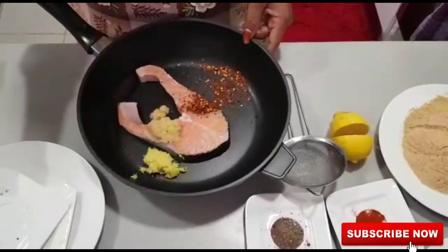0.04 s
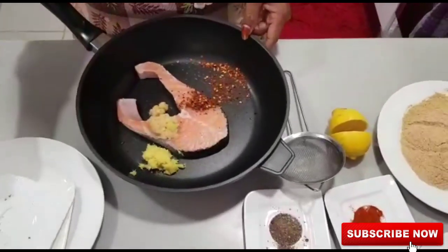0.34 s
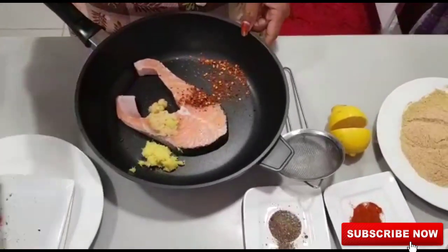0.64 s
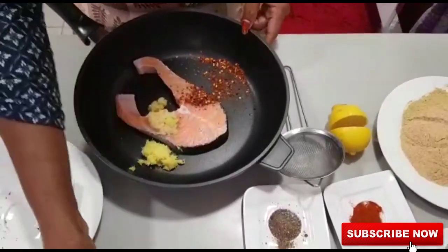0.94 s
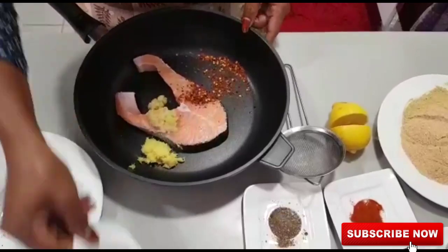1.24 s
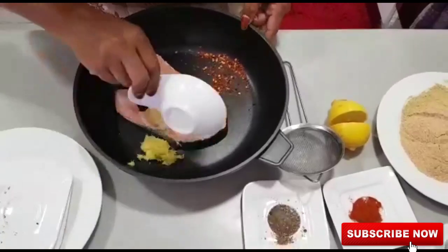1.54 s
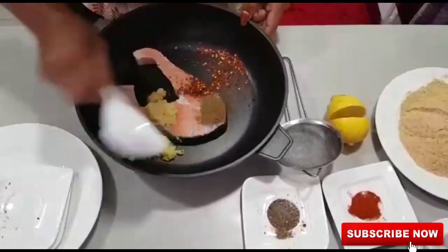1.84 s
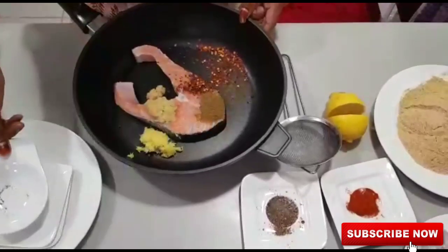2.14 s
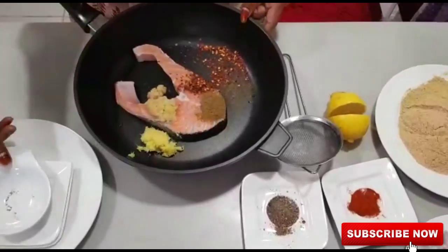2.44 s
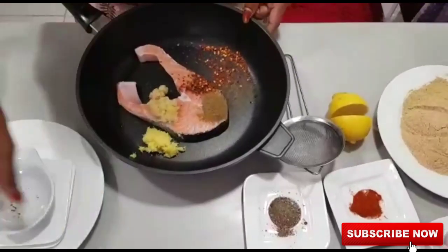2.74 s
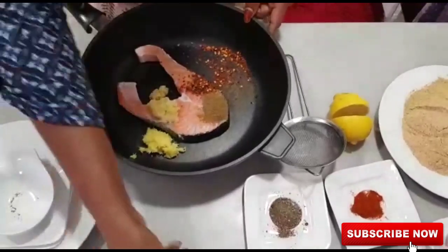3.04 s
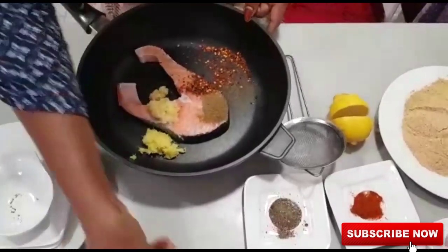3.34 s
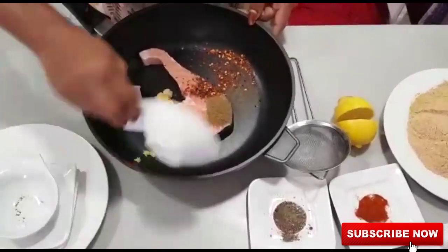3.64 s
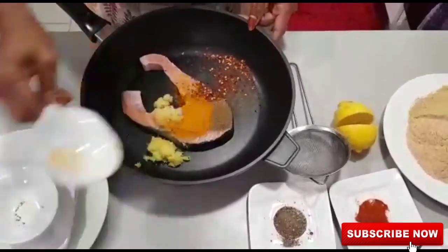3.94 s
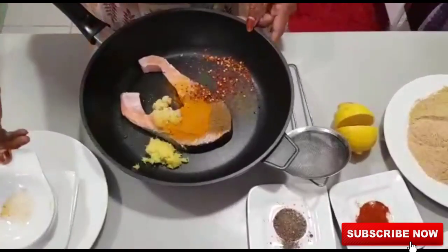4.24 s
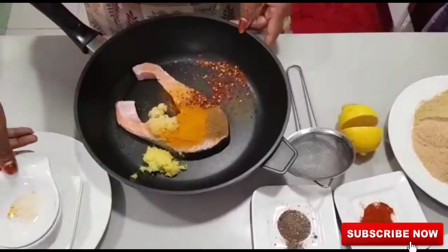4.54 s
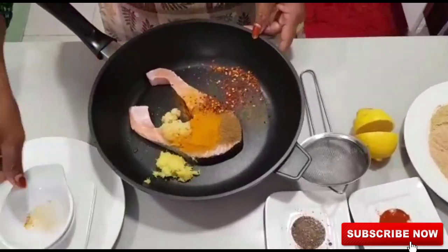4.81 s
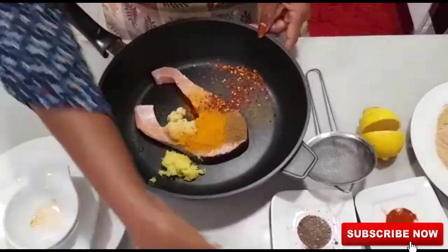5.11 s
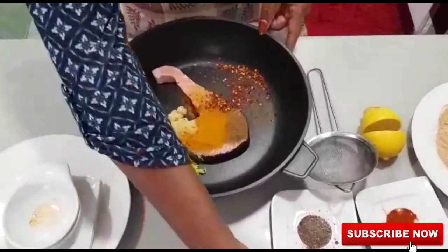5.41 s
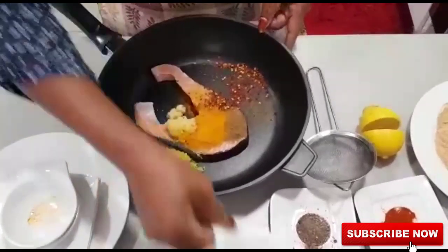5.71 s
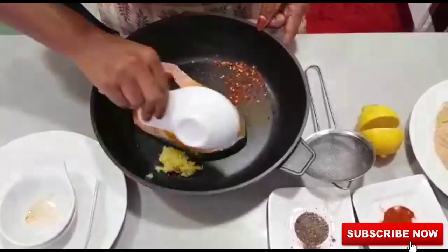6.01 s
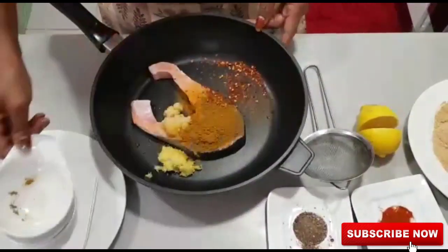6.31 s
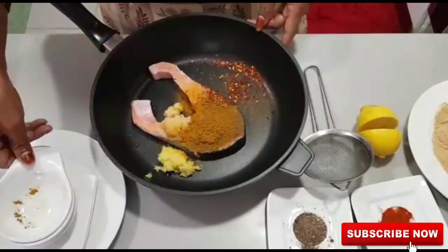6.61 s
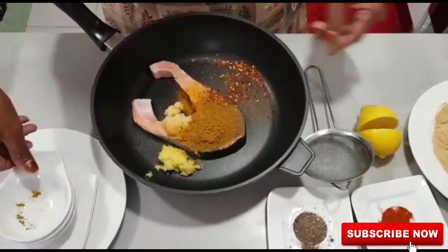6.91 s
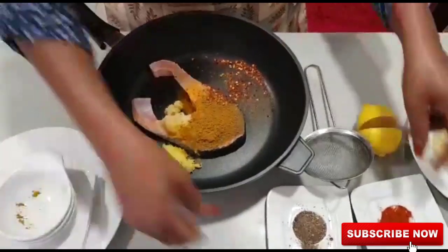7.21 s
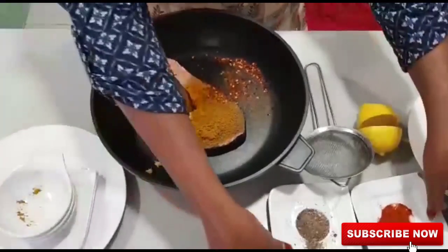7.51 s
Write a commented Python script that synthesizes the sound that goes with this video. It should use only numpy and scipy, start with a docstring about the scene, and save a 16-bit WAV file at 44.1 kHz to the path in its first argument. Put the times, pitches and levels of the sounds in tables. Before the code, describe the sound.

In a quiet, hard-walled kitchen, a ceramic dish clatters onto a plate and settles. Small spice bowls are then handled one after another: a knock on the worktop or a faint scrape as one is lifted, then a bright clink and rattle as it is stacked slightly to the left. This happens three times, and a last light knock follows. Close microphones above the worktop catch a short echo and low room noise.

```python
"""Over a low room murmur, a square ceramic dish clatters onto a plate in a quiet, hard-walled kitchen.
Spices are being tipped into a frying pan: each small dish knocks on the worktop as it is picked up,
then clatters onto the stack of plates or into the bowl before it.
A pair of microphones hangs above the worktop, with the stack to the left and the full dishes in front."""
import sys
import numpy as np
from scipy import signal
from scipy.fft import rfft, irfft, next_fast_len
from scipy.io import wavfile

SR = 44100
rng = np.random.default_rng(int(sys.argv[2]) if len(sys.argv) > 2 else 0)


def store_wav(level_fs):
    """Save 16-bit WAV to argv[1]."""
    pcm = np.round(np.clip(np.atleast_2d(level_fs), -1, 1) * 32767)
    wavfile.write(sys.argv[1], SR, pcm.T.astype(np.int16))


N = 337611
TIME = np.arange(N) / SR
AGE = np.arange(int(.7 * SR)) / SR   # seconds since a contact


def from_db(db):
    """Decibels to gain."""
    return 10 ** (np.asarray(db) / 20)


def rms_one(x):
    """Scale to rms 1."""
    return x / np.sqrt(np.mean(x ** 2) + 1e-20)


def attack_one(x):
    """Scale so that the first 12 ms have rms 1."""
    return x / np.sqrt(np.mean(x[AGE < .012] ** 2) + 1e-20)


def at_hz(points, hz, column=1):
    """Read one column of a table along log frequency."""
    points = np.array(points)
    return np.interp(np.log(hz + 1e-9), np.log(points[:, 0]), points[:, column])


def dying(t60):
    """Envelope that falls 60 dB in t60 seconds."""
    return np.exp(-np.log(1000) * AGE / t60)


def band(x, low_hz, high_hz, order=2):
    """Causal band-pass."""
    sos = signal.butter(order, [low_hz, min(high_hz, SR / 2 - 500)], "band", fs=SR, output="sos")
    return signal.sosfilt(sos, x + 1e-18)


def resonance(x, hz, width_hz):
    """One resonance with gain 1 on top."""
    r = np.exp(-np.pi * width_hz / SR)
    feedback = [1, -2 * r * np.cos(2 * np.pi * hz / SR), r * r]
    return signal.lfilter(np.array([1, 0, -1]) * (1 - r * r) / 2, feedback, x + 1e-18)


def steep_resonance(x, hz, width_hz):
    """The same resonance twice, for steeper flanks."""
    return resonance(resonance(x, hz, width_hz), hz, width_hz)


def add(track, s, sound):
    """Mix a sound into the track at s seconds."""
    start = int(s * SR)
    track[start:start + len(sound)] += sound[:N - start]


# Diffuse sound across the microphone pair: f/Hz, left-right correlation
PAIR_CORRELATION = [(60, 0.85), (300, .92), (700, 0.33), (1400, 0.32), (3000, -0.11), (15000, 0.13)]

def diffuse_bands(size):
    """Yield (Hz, stereo noise) in half octaves, as alike in both microphones as sound from all sides."""
    edges = np.geomspace(25, 18000, 20)
    white = rng.standard_normal((2, 2, size))
    for k, (low, high) in enumerate(zip(edges, edges[1:])):
        hz = np.sqrt(low * high)
        mid, side = band(white[k % 2], low, high)
        alike = at_hz(PAIR_CORRELATION, hz)
        yield hz, np.sqrt((1 + alike) / 2) * mid + np.sqrt((1 - alike) / 2) * side * np.array([[1], [-1]])


# Room tone from all around the pair, murmur and hiss: f/Hz, relative level/dB per Hz
MURMUR_SPECTRUM = [(25, -32.5), (55, -15), (80, -22), (120, -10.5), (200, -10), (330, -5.5), (560, -24.5),
                   (770, -20.5), (1200, -28), (2000, -34.5), (3000, -39.5)]
HISS_SPECTRUM = [(3000, -3.5), (4300, 3.5), (5200, -3.5), (6500, -8), (7500, -4), (9000, -3), (12000, -4.5),
                 (15000, -2), (16000, -7.5)]
# The kitchen's standing waves, alike in both microphones: f/Hz, width/Hz, relative level/dB
ROOM_MODES = [(56.7, 3.3, -60), (127, 17, -60), (155.2, 4.7, -61.5), (174.2, 12, -66), (239.3, 24, -50.5),
              (292, 32, -59.5), (330.4, 24, -53.5), (371.4, 17, -58), (766, 53, -66.5)]
# Slow swell of murmur and standing waves: t/s, level/dB
ROOM_SWELL = [(0, -56.5), (1, -52.5), (2, -56), (3.6, -53), (5.6, -51.5), (6.3, -53), (7.6, -47)]

def room_tone(waves_db=1, hiss_start_db=-76, hiss_rise_db=7.5):
    """Low room noise gathered in standing waves, under a faint hiss that slowly rises."""
    bands = list(diffuse_bands(N))
    murmur = sum(from_db(at_hz(MURMUR_SPECTRUM, hz)) * noise for hz, noise in bands if hz < 3000)
    hiss = sum(from_db(at_hz(HISS_SPECTRUM, hz)) * noise for hz, noise in bands if hz >= 3000)
    waves = sum(from_db(db) * rms_one(steep_resonance(rng.standard_normal(N), hz, width))
                for hz, width, db in ROOM_MODES)
    swell = from_db(np.interp(TIME, *np.transpose(ROOM_SWELL)))
    hiss_gain = from_db(hiss_start_db + hiss_rise_db * TIME / TIME[-1])
    return swell * (rms_one(murmur) + from_db(waves_db) * rms_one(waves)) + hiss_gain * rms_one(hiss)


def mode_rings(modes):
    """One decaying sine for each mode; glazed clay loses its high modes soonest, which caps t60."""
    return np.array([from_db(db) * np.sin(2 * np.pi * hz * AGE) * dying(min(t60, .52 * (hz / 1600) ** -.45))
                     for hz, db, t60 in modes])


def crack(t60, snap_db, repeat_db, count=95):
    """A snap of noise and a crowd of sines: the many modes of dishes that touch and damp each other."""
    snap = from_db(snap_db) * rng.standard_normal(len(AGE)) * dying(.0068)
    spectrum = np.zeros(len(AGE) // 2 + 1, complex)
    bins = (np.arange(count) + rng.random(count)) / count * (len(spectrum) - 1)
    spectrum[bins.astype(int)] = np.exp(2j * np.pi * rng.random(count))
    crowd = rms_one(irfft(spectrum, len(AGE))) * dying(t60)
    touch = (crowd + snap) * (1 - dying(.005))   # the blow takes a moment to spread through the stack
    repeat = int(rng.uniform(.006, .014) * SR)   # a quieter repeat of the crack follows 6-14 ms later
    return touch + from_db(repeat_db) * np.pad(touch, (repeat, 0))[:len(touch)]


def thud(hz, width_hz, t60, boom_db):
    """The worktop answers with a short, woody thud over a slower low boom."""
    wood_noise, slab_noise = rng.standard_normal((2, len(AGE)))
    pitch_hz = hz * 2 ** (.17 * rng.standard_normal())
    wood = band(resonance(wood_noise * dying(t60), pitch_hz, width_hz), 52, 1500)
    boom = band(slab_noise, 42, 150) * dying(.16)
    return attack_one(wood) + from_db(boom_db) * rms_one(boom) * np.sqrt(.012 / AGE[-1])


OPEN_T60, HELD_T60 = 2.5, .55   # extra damping of an open dish, and of one nested or held (s)
USUAL_BLOW_DB = -20   # the strength at which thud, ring and shimmer are given

def clatter(hits, modes, damping_t60, crack_t60, snap_db, repeat_db, ring_db, shimmer_db,
            knock_hz, knock_width_hz, clink_db, tick_db, thud_db, worktop):
    """Each contact gives a crack, a thud, a click of glaze and ringing modes. Returns (blows, rings)."""
    blows, rings = np.zeros((2, N))
    free_modes = mode_rings(modes) * dying(damping_t60)
    for s, db, softness in hits:
        # the point of contact decides how strongly each mode is struck
        strengths = from_db(3 * rng.standard_normal(len(modes))) * rng.choice([-1, 1], len(modes))
        crack_and_ring = np.array([crack(crack_t60, snap_db, repeat_db), strengths @ free_modes])
        centre_hz = knock_hz * 2 ** (-.02 * softness)   # a softer contact knocks lower
        knock = band(steep_resonance(crack_and_ring, centre_hz, knock_width_hz), 500, 2900)
        clink = band(crack_and_ring, 2800, 6800, order=4)
        clink -= .6 * resonance(clink, 4200, 700)   # dishes radiate little between two groups of modes
        tick = band(crack_and_ring, 6800, 13200, order=3)
        excess_db = db - USUAL_BLOW_DB
        add(blows, s, from_db(thud_db + .65 * excess_db) * thud(**worktop))
        # these lie about an octave apart: a soft contact loses the upper ones
        registers = (knock, 0, ring_db), (clink, clink_db, shimmer_db), (tick, tick_db, shimmer_db)
        for octave, ((blow, ring), colour_db, share_db) in enumerate(registers):
            ring_share = from_db(share_db + excess_db)   # a strong blow throws the dish clear to ring
            gain = from_db(db + colour_db - softness * octave) / np.sqrt(1 + ring_share ** 2)
            add(blows, s, gain * attack_one(blow))
            add(rings, s, gain * ring_share * attack_one(ring))
        glaze = band(rng.standard_normal(len(AGE)) * dying(.003), 9500, 17000)
        add(blows, s, from_db(db + tick_db - 2 * softness - 13) * attack_one(glaze))
    return np.array([blows, rings])


# Contacts on the large plate, a little left of the pair: t/s, level/dB, softness/dB per octave
PLATE_CONTACTS = [(0.165, -15, 4), (0.179, -10.5, 4.4), (0.2635, -20, 5.8), (0.3175, -19.5, 6.4),
                  (0.348, -16, 20), (0.6435, -17, 18)]
# Their ring: f/Hz, level/dB, t60/s before damping
PLATE_RING = [(1186, -6, 0.41), (1628, -5, 0.36), (2216, -1, 0.31), (2359, 0, 0.3), (2647, -3, 0.29),
              (3701, -2, 0.25), (4448, -8, 0.23), (4617, -5, 0.22), (5120, -9, 0.21), (5267, -7, 0.21),
              (5341, -6, 0.21), (6581, -7, 0.19), (7388, -10, 0.18), (7790, -7, 0.18), (9335, -10, 0.16),
              (10064, -4, 0.16), (10761, -11, 0.15), (11198, -14, 0.15), (11717, -5, 0.15),
              (12520, -8, 0.14), (13374, -10, 0.14), (15124, -17, 0.13)]

def dish_on_plate():
    """A square dish clatters onto a large plate and settles."""
    return clatter(PLATE_CONTACTS, PLATE_RING, OPEN_T60, crack_t60=.05, snap_db=-2.5, repeat_db=-7,
                   ring_db=-12, shimmer_db=-3.5, knock_hz=2400, knock_width_hz=1900, clink_db=-.5,
                   tick_db=-1, thud_db=-31.5, worktop=dict(hz=340, width_hz=210, t60=.077, boom_db=-15))


# Knocks on the worktop, in front of the pair: t/s, level/dB, softness/dB per octave
LIFT_CONTACTS = [(1.0815, -34, 18), (1.1615, -20, 4.3), (1.169, -15, 16), (1.207, -22, 8.2),
                 (3.195, -21, 7.7), (3.204, -17, 17), (5.533, -41, 21), (7.405, -46, 14), (7.5965, -25, 10)]
# Ring of a dish in the hand: f/Hz, level/dB, t60/s before damping
LIFT_RING = [(1150, -12, 0.177), (1400, -5, 0.22), (1584, -9, 0.1), (1690, -3, 0.3), (1859, 1, 0.22),
             (1982, 2, 0.16), (2882, -4, 0.25), (4170, -30, 0.178), (5000, -33, 0.2), (7100, -36, 0.076),
             (10656, -42, 0.14)]

def lifted_dishes():
    """Full dishes rock on the worktop as they are lifted."""
    return clatter(LIFT_CONTACTS, LIFT_RING, HELD_T60, crack_t60=.027, snap_db=0, repeat_db=-9.5,
                   ring_db=-14, shimmer_db=-1.5, knock_hz=2030, knock_width_hz=710, clink_db=-15.5,
                   tick_db=-3, thud_db=-29, worktop=dict(hz=380, width_hz=1350, t60=.057, boom_db=-19))


# Dishes sliding before they lift or settle, in front of the pair: t/s, level/dB
DISH_SLIDES = [(1.147, -45.5), (3.186, -51.5), (4.779, -46), (5.492, -54.5), (6.84, -53), (7.595, -44)]

def slides(swell_s=.034, bumps_per_s=900):
    """An unglazed foot ring catches on tiny bumps, which excite the dish's knock."""
    pressure = sum(from_db(db) * np.exp(-((TIME - s) / swell_s) ** 2) for s, db in DISH_SLIDES)
    bumps = (rng.random(N) < bumps_per_s / SR) * rng.standard_normal(N)
    return pressure * rms_one(band(resonance(bumps, 1200, 800), 700, 3200))


# The first bowl, left of the pair: t/s, level/dB, softness/dB per octave
FIRST_CONTACTS = [(1.958, -50.5, 1), (2.5517, -32.5, 13), (2.573, -22, 11.4), (2.61, -40, 3),
                  (2.6695, -17, 4), (2.6785, -18, 2.5), (2.765, -19.5, 13)]
# Its open ring: f/Hz, level/dB, t60/s before damping
FIRST_RING = [(1304, -5, 0.35), (1404, -6, 0.34), (1679, -6, 0.31), (1783, 0, 0.3), (1882, -2, 0.3),
              (2451, -8, 0.26), (2796, -2, 0.25), (3591, -11, 0.22), (4324, -6, 0.2), (5331, -13, 0.19),
              (6209, -13, 0.17), (7023, -15, 0.16), (7187, -12, 0.16), (7950, -14, 0.16),
              (11390, -20, 0.13), (12535, -22, 0.13), (12602, -25, 0.13), (14887, -22, 0.12)]

def first_bowl():
    """The first bowl is tapped empty and set on the plates."""
    return clatter(FIRST_CONTACTS, FIRST_RING, OPEN_T60, crack_t60=.022, snap_db=-8, repeat_db=-8,
                   ring_db=-8, shimmer_db=1, knock_hz=2050, knock_width_hz=1730, clink_db=-5,
                   tick_db=-4, thud_db=-30.5, worktop=dict(hz=284, width_hz=160, t60=.051, boom_db=-12))


# The square dish on the stack, left of the pair: t/s, level/dB, softness/dB per octave
SQUARE_CONTACTS = [(2.3055, -18, 3), (2.318, -24, 4), (2.4355, -30, 12)]
# Its open ring: f/Hz, level/dB, t60/s before damping
SQUARE_RING = [(1380, -8, 0.36), (1642, -6, 0.34), (2450, -1, 0.28), (3814, -11, 0.23), (4653, -16, 0.21),
               (5383, 0, 0.2), (6963, -8, 0.18), (9721, -11, 0.15), (11804, -8, 0.14), (12518, -24, 0.13),
               (13332, -22, 0.13), (13889, -21, 0.13)]

def square_dish_rim():
    """The square dish rings as the first bowl catches its rim."""
    return clatter(SQUARE_CONTACTS, SQUARE_RING, OPEN_T60, crack_t60=.04, snap_db=-5, repeat_db=-12,
                   ring_db=-4, shimmer_db=3, knock_hz=2200, knock_width_hz=1900, clink_db=-3,
                   tick_db=-3, thud_db=-29, worktop=dict(hz=280, width_hz=150, t60=.06, boom_db=-11))


# The second bowl, left of the pair: t/s, level/dB, softness/dB per octave
SECOND_CONTACTS = [(4.2595, -19.5, 0.3), (4.274, -19.5, 6), (4.349, -23.5, 6.4), (4.5085, -21, 9.5),
                   (4.529, -25.5, 9), (4.614, -27, 15), (4.806, -18.5, 0.8)]
# Its nested ring: f/Hz, level/dB, t60/s before damping
SECOND_RING = [(1345, -5, 0.29), (1784, 0, 0.26), (2464, -13, 0.22), (2876, -14, 0.21), (3478, -14, 0.19),
               (3619, -10, 0.19), (5188, -14, 0.16), (6284, -12, 0.15), (7436, -2, 0.14), (7805, -7, 0.13),
               (9248, -9, 0.12), (9453, -10, 0.12), (10244, -16, 0.12), (11405, -15, 0.11),
               (12964, -20, 0.11), (13523, -19, 0.1)]

def second_bowl():
    """The second bowl drops into the first, which damps it."""
    return clatter(SECOND_CONTACTS, SECOND_RING, HELD_T60, crack_t60=.036, snap_db=4, repeat_db=-4.5,
                   ring_db=-9, shimmer_db=-6, knock_hz=1700, knock_width_hz=900, clink_db=-3,
                   tick_db=.5, thud_db=-28, worktop=dict(hz=271, width_hz=200, t60=.053, boom_db=-12))


# The third bowl, left of the pair: t/s, level/dB, softness/dB per octave
THIRD_CONTACTS = [(6.4745, -14, 5.3), (6.505, -23, 15), (6.519, -22, 16), (6.535, -23, 16),
                  (6.597, -28, -2.5), (6.826, -41, 15), (6.919, -31.5, 5.3), (7.047, -25.5, 2.4)]
# Its nested ring: f/Hz, level/dB, t60/s before damping
THIRD_RING = [(1344, -11, 0.22), (1455, -10, 0.21), (1656, 0, 0.2), (2830, -14, 0.15), (3296, -14, 0.14),
              (3404, -17, 0.14), (3746, -18, 0.14), (3980, -20, 0.13), (4386, -19, 0.13), (4901, -14, 0.12),
              (6183, -16, 0.11), (7831, -8, 0.1), (9239, -9, 0.09), (11337, -17, 0.08), (12201, -23, 0.08),
              (12898, -20, 0.08), (12981, -20, 0.08), (14974, -23, 0.07)]

def third_bowl():
    """The third bowl drops into the second and rattles to rest."""
    return clatter(THIRD_CONTACTS, THIRD_RING, HELD_T60, crack_t60=.016, snap_db=-3, repeat_db=-9,
                   ring_db=0, shimmer_db=-10.5, knock_hz=1594, knock_width_hz=700, clink_db=-1.5,
                   tick_db=2.5, thud_db=-33, worktop=dict(hz=268, width_hz=170, t60=.039, boom_db=-4))


# Single rim tones, in front of the pair: t/s, level/dB, f/Hz, t60/s before damping
RIM_PINGS = [(6.596, -26, 4901, 0.11), (6.918, -44, 4740, 0.33), (7.5954, -36, 4580, 0.17),
             (7.5957, -34.5, 6760, 0.14)]
# A rim there, grazed by its neighbour: f/Hz, level/dB, t60/s before damping
GRAZED_RING = [(2857, -10, 0.31), (3985, -11, 0.27), (5149, -6, 0.24), (6442, 0, 0.21), (9418, -12, 0.18),
               (11111, -11, 0.17), (14954, -17, 0.15)]

def rim_touches(graze_s=7.458, graze_db=-44):
    """Light touches of two rims: pure, high pings."""
    track = np.zeros(N)
    for s, db, hz, t60 in RIM_PINGS:
        add(track, s, mode_rings([(hz, db, t60)])[0])
    add(track, graze_s, from_db(graze_db) * mode_rings(GRAZED_RING).sum(axis=0))
    return track


def at_microphones(x, right_lag_ms):
    """Crockery nearby delays each pitch differently; sound from the left reaches the right side later."""
    delay_s = np.interp(np.arange(1025), np.linspace(0, 1024, 60), rng.uniform(.0005, .005, 60))
    scatter = irfft(np.exp(-2j * np.pi * np.cumsum(delay_s) * SR / 2048))
    scattered = from_db(-5) * band(signal.oaconvolve(x, scatter)[:N], 700, 17000, order=1)
    right = np.interp(TIME - right_lag_ms / 1000, TIME, x - scattered)
    return from_db(-1.5) * np.array([x + scattered, right])


# The hard walls, heard from above the worktop: f/Hz, t60/s, level/dB
KITCHEN_REVERB = [(70, 0.42, 2), (255, 0.3, 0.5), (814, 0.5, 0), (1870, 0.48, -6), (4800, 0.38, -2.5),
                  (8000, 0.38, -6), (14000, 0.21, -3.5)]

def kitchen_echoes(x, first_echo_s=.004, build_s=.0015):
    """Echoes set in after a short gap and die away, the highest treble first."""
    onset = 1 - np.exp(-np.maximum(AGE - first_echo_s, 0) / build_s)
    tail = 0
    for hz, noise in diffuse_bands(len(AGE)):
        shape = onset * dying(at_hz(KITCHEN_REVERB, hz))
        gain = from_db(at_hz(KITCHEN_REVERB, hz, column=2))
        tail = tail + gain * noise * shape / np.sqrt(np.sum(shape ** 2))
    return signal.fftconvolve(x[None], tail, axes=1)[:, :N]


def scene():
    """The stack stands to the left, the full dishes in front; the room answers both."""
    plate = dish_on_plate()
    open_dishes = first_bowl() + square_dish_rim()
    nested = second_bowl() + third_bowl()
    front = lifted_dishes().sum(axis=0) + slides() + rim_touches()
    direct = from_db(1) * at_microphones((open_dishes + nested).sum(axis=0), right_lag_ms=.2475)
    direct += from_db(-4.04) * at_microphones(front, right_lag_ms=-.036)
    direct += at_microphones(plate.sum(axis=0), right_lag_ms=.14)
    blows, rings = plate + from_db(1.5) * open_dishes + nested
    # the ringing tones get less room echo than the blows
    echo_send = blows + from_db(-3) * rings + from_db(-5) * front
    return direct + kitchen_echoes(echo_send) + room_tone()


# Colour of the two microphones: f/Hz, left minus right level/dB
PAIR_BALANCE = [(100, 0.5), (400, 1.65), (1100, -1), (2200, -1), (4800, 5), (9000, 2), (14000, -0.5)]

def record(dry, clip_at=.85, cutoff_hz=15800):
    """The two microphones differ in colour; the highest peaks are clipped and the top is cut."""
    size = next_fast_len(N + len(AGE))
    lead_db = at_hz(PAIR_BALANCE, np.arange(size // 2 + 1) * SR / size)
    gains = from_db(np.array([lead_db, -lead_db]) / 2)
    coloured = irfft(rfft(dry, size) * gains, size)[:, :N]
    low_pass = signal.ellip(10, .2, 70, cutoff_hz, fs=SR, output="sos")
    return signal.sosfilt(low_pass, np.clip(coloured, -clip_at, clip_at))


dry = scene()
out = record(dry)
store_wav(out)
```